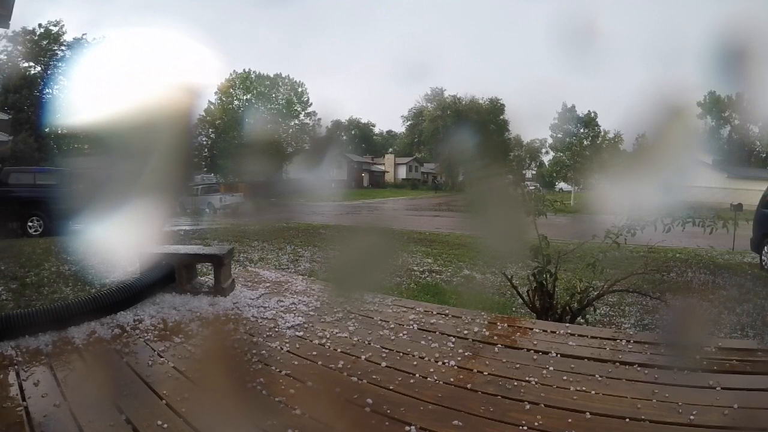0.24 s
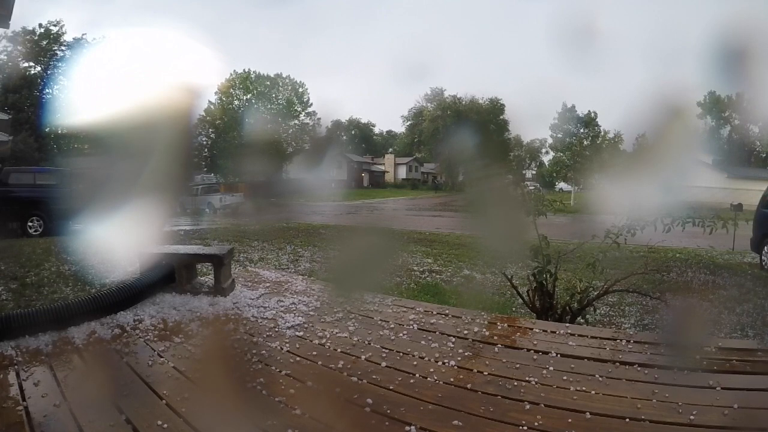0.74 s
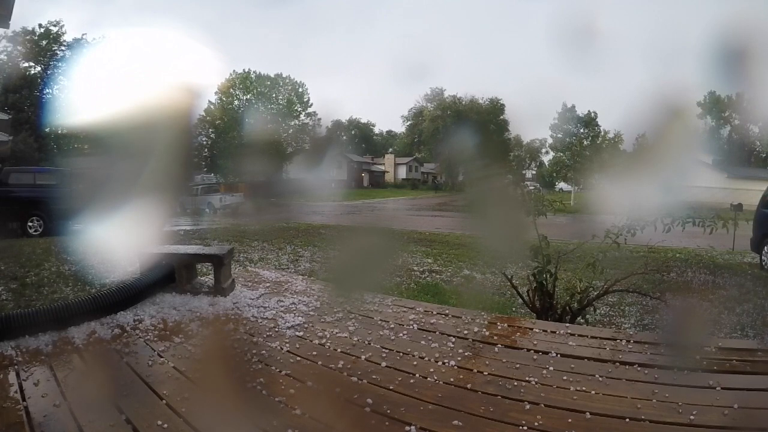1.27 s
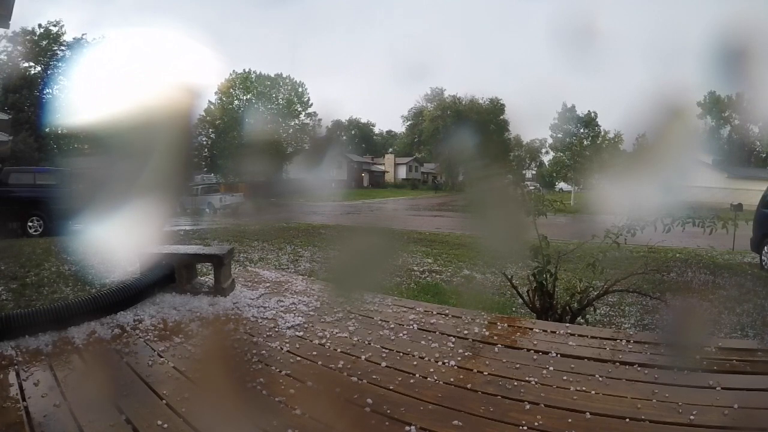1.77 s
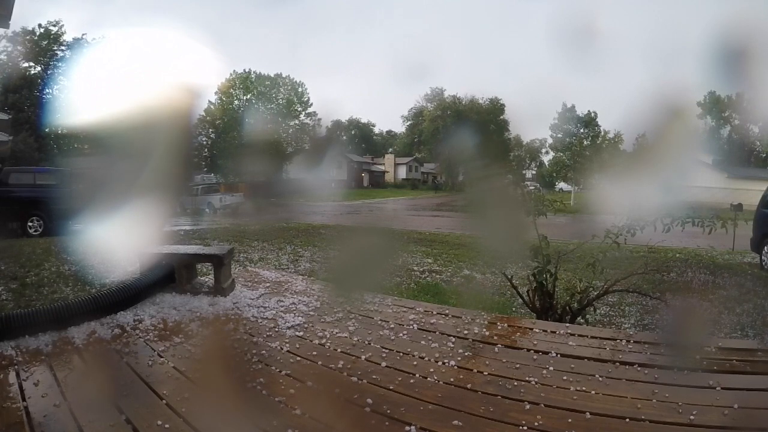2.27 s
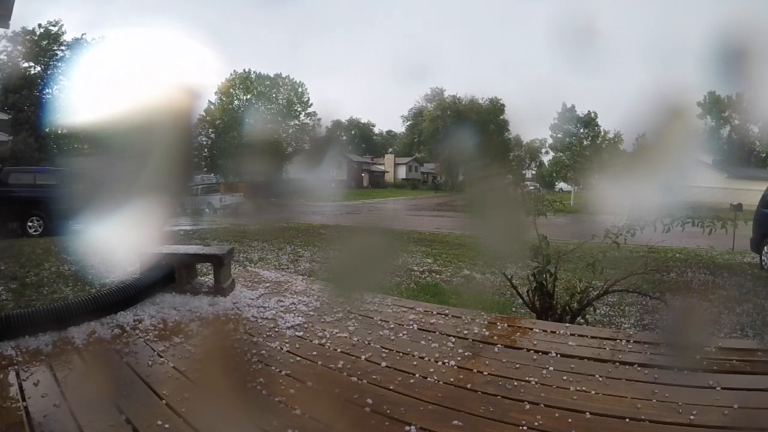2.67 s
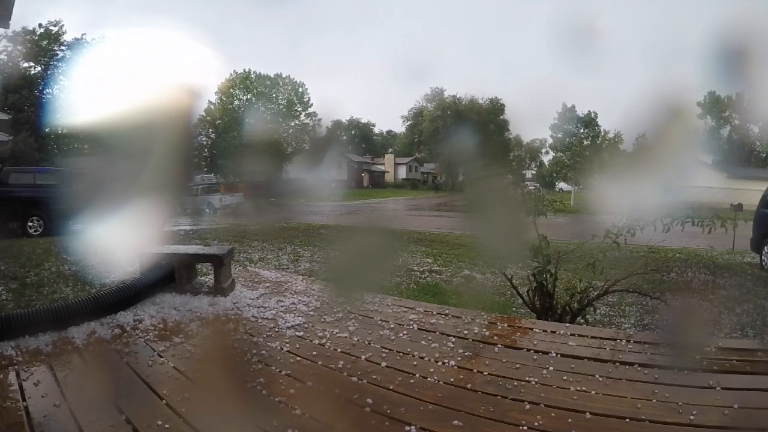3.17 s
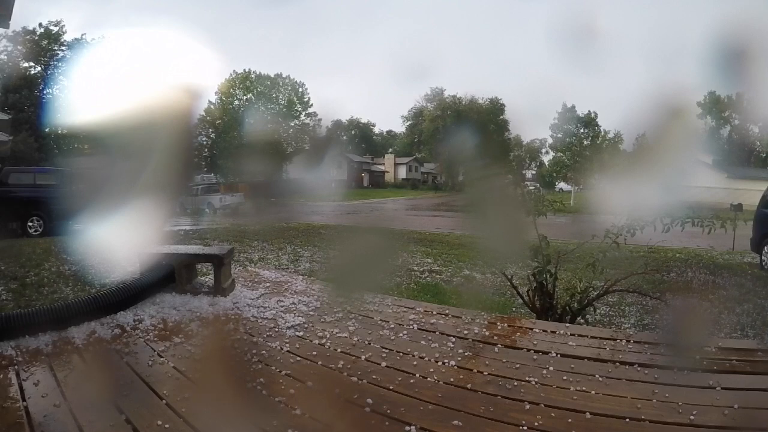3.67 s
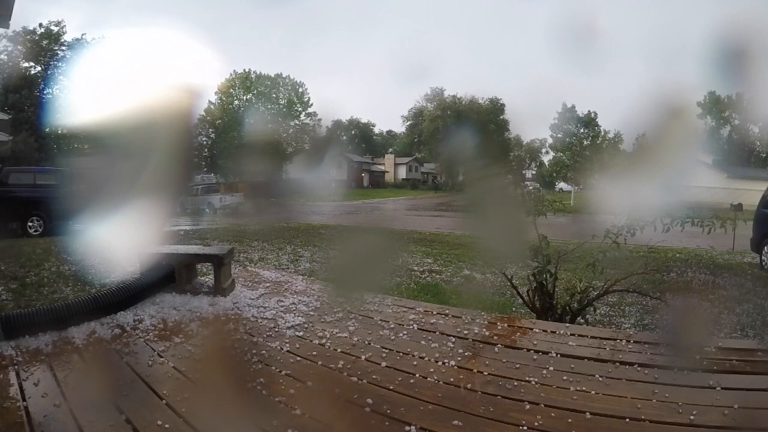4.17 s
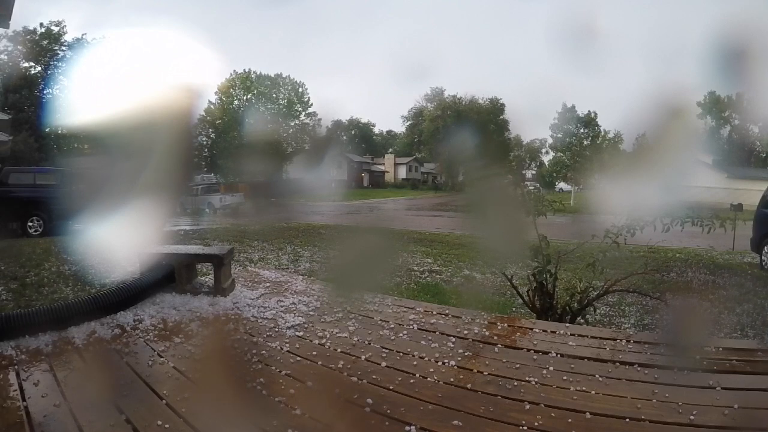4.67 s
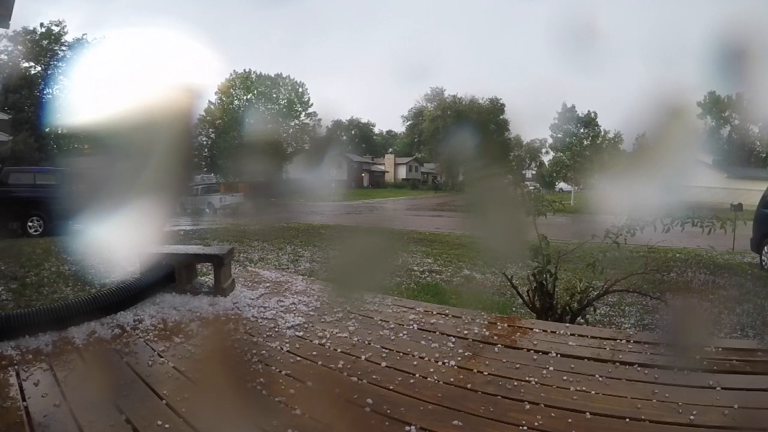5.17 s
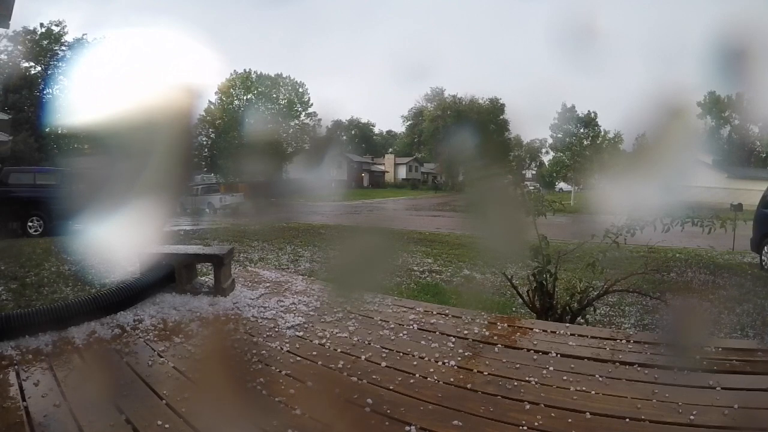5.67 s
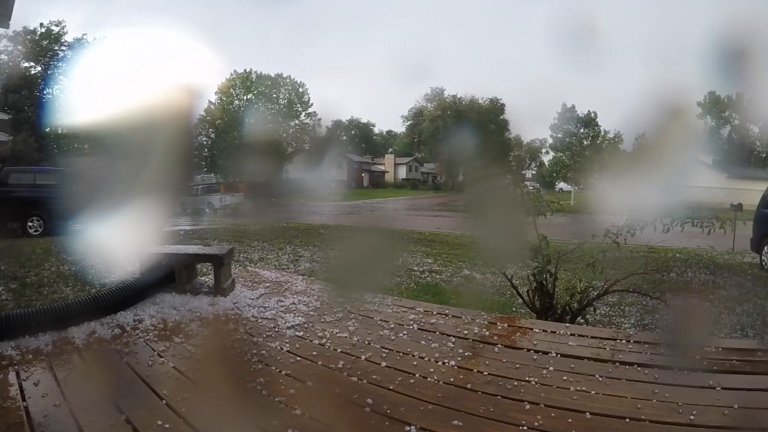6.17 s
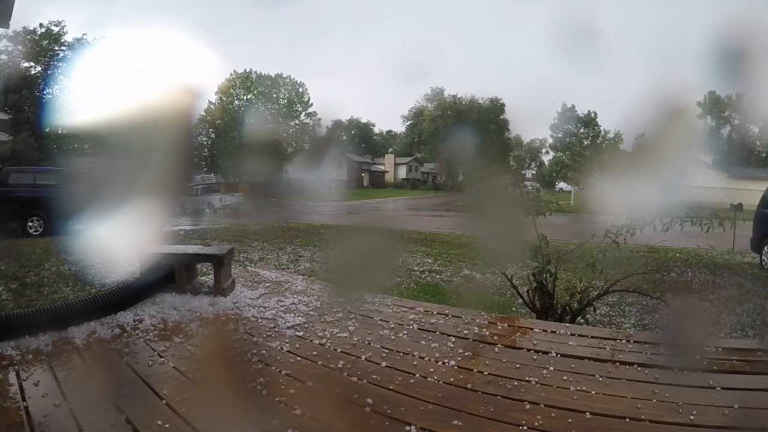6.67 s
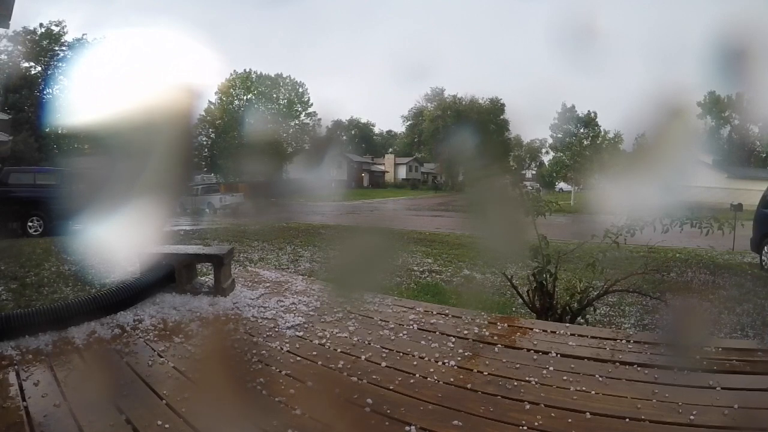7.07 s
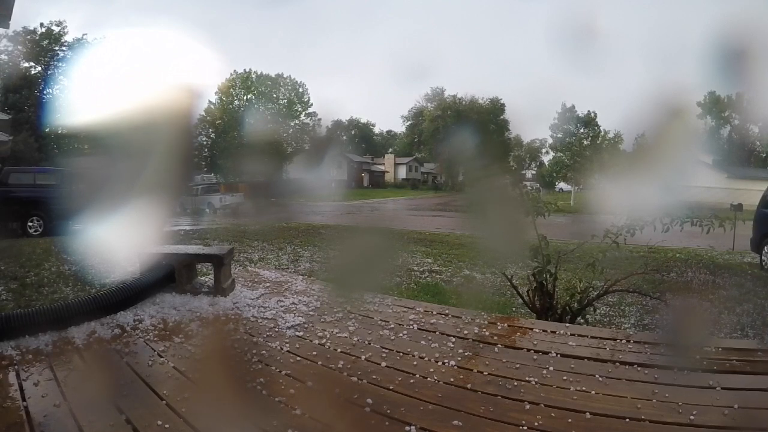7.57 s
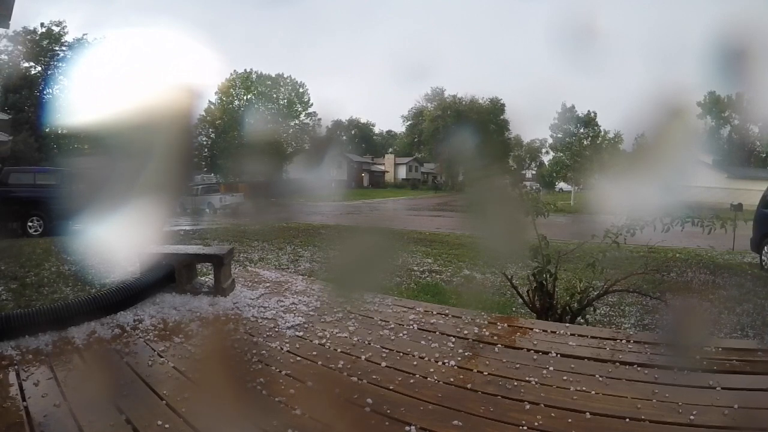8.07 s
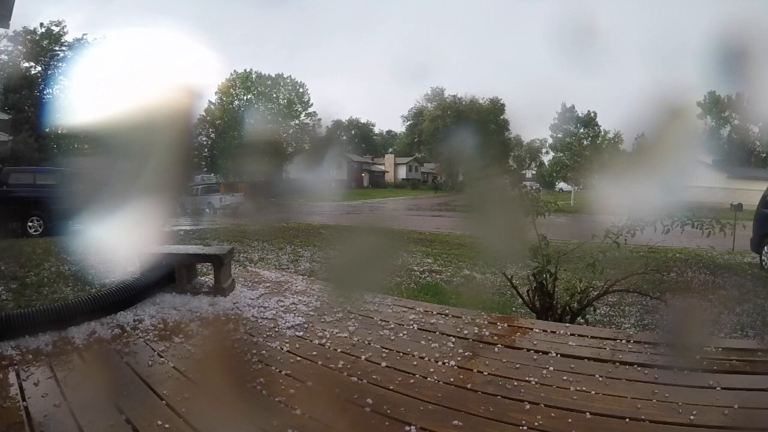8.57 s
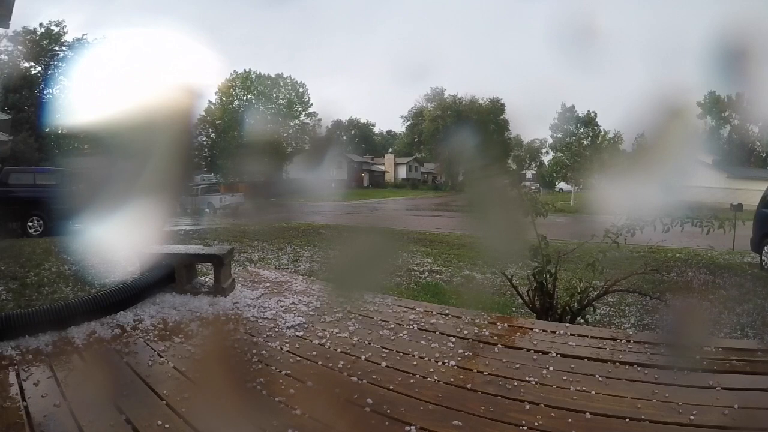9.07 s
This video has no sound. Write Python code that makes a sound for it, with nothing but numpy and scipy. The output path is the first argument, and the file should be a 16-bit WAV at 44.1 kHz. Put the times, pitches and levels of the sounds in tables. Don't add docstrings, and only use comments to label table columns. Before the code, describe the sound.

Outdoors on a wooden deck, hail falls steadily from start to finish. Low woody thumps with short boomy tails come several per second, mixed with very close plastic cracks, knocks and tiny ticks. Fine rain hisses softly behind. Slow gusts add a very deep rumble. The microphone sits on the deck inside a small plastic housing; the hardest blows clip and briefly duck everything, in wide but close stereo.

```python
import sys
import numpy as np
from scipy import signal
from scipy.fft import rfft, irfft, next_fast_len
from scipy.io import wavfile
from scipy.ndimage import uniform_filter1d

SR = 44100
rng = np.random.default_rng(int(sys.argv[2]) if len(sys.argv) > 2 else 0)


def to_wav(s):
    ch = np.atleast_2d(s).T
    pcm = np.round(np.clip(ch, -1, 1) * 32767)
    wavfile.write(sys.argv[1], SR, pcm.astype(np.int16))


def gain_from_db(level_db):
    decades = np.asarray(level_db, float) / 20
    return 10 ** decades


N = 411453
BLOW_UNEVEN_DB = 1.5


def evened(x):
    return x / np.sqrt(np.mean(x ** 2) + 1e-20)


def read(points, hz):
    f, value = np.transpose(points)
    return np.interp(np.log(hz + 1), np.log(f + 1), value)


def curve(rows):
    start_s, level_db = np.transpose(rows)
    return np.interp(np.arange(N) / SR, start_s, level_db)


def add(mix, start_s, sound):
    part = mix[..., round(start_s * SR):][..., :sound.shape[-1]]
    part += sound[..., :part.shape[-1]]


def at(course, start_s):
    return course[round(start_s * SR)]


# start_s, drop_db
GAIN_TRIPS = [
    (0.447, 4.5),
    (1.487, 20),
    (2.578, 11),
    (4.575, 2),
    (5.225, 3),
    (6.331, 9),
    (6.497, 8),
    (7.598, 10),
    (9.177, 13.5),
]


def gain_db():
    t, out = np.arange(N) / SR, np.zeros(N)
    for start_s, drop_db in GAIN_TRIPS:
        since = np.maximum(t - start_s, 0)
        quick = .72 * np.exp(-(since / .1) ** 1.7)
        slow = .28 * np.exp(-since / .6)
        out -= drop_db * (t > start_s) * (quick + slow)
    return uniform_filter1d(out, size=100)


def ring(modes, uneven_db, detune, seconds, rise_s):
    hz, db, t60 = np.transpose(modes)[..., None]
    t = np.arange(int(seconds * SR)) / SR
    pitch_chance, level_chance, phase_chance = rng.standard_normal((3, 2, len(modes), 1))
    tone = np.sin(2 * np.pi * (hz * (1 + detune * pitch_chance) * t + 0.22 * phase_chance))
    decay = gain_from_db(db + uneven_db * level_chance - 60 * t / t60)
    out = (decay * tone).sum(1) * (1 - np.exp(-t / rise_s)) ** 2
    return out / np.abs(out).max(1, keepdims=True)


def patter(modes, per_s, spread_db, uneven_db, detune, seconds, rise_s, kinds):
    out = np.zeros((2, N))
    for _ in range(kinds):
        lands = rng.random(N) < per_s / kinds / SR
        hits = lands * gain_from_db(spread_db * np.minimum(rng.exponential(1, N), 3.5))
        blow = ring(modes, uneven_db, detune, seconds, rise_s)
        out += signal.oaconvolve(hits[None], blow, axes=1)[:, :N]
    return evened(out)


# freq_hz, density_db (per Hz)
RAIN_SPECTRUM = [(400, -29), (600, -2.5), (800, -3), (1000, -4), (1430, -3), (2010, -12.5), (2500, -17),
                 (3500, -22), (4800, -22), (6300, -20.5), (10500, -25.5), (12600, -37), (14200, -31.5),
                 (16000, -82.5)]


def rain():
    frames, hz = N // 128 + 5, np.fft.rfftfreq(512, 1 / SR)
    a, b, c, d, patches = rng.standard_normal((frames, 257, 5)).T
    patches = uniform_filter1d(patches, size=10, axis=0)
    patches = evened(uniform_filter1d(patches, size=5, axis=1))
    flicker = evened(uniform_filter1d(rng.standard_normal(frames), size=3))
    level = gain_from_db(read(RAIN_SPECTRUM, hz)[:, None] + 1.9 * patches + 1.1 * flicker)
    spectra = np.array([a + 1j * b, c + 1j * d]) * level
    hiss = signal.istft(spectra, nperseg=512, noverlap=384)[1][:, :N]
    return gain_from_db(-43.5) * evened(hiss)


# start_s, level_db
ROCKING_GUSTS = [(0, -58.5), (1.36, -54), (1.46, -44.5), (2.3, -30.5), (2.7, -29.5), (3.55, -29.5),
                 (3.9, -43), (4.65, -43.5), (5.15, -51), (5.3, -36), (6.25, -51.5), (6.36, -33.5),
                 (6.75, -29), (7.3, -30), (7.7, -29.5), (8.1, -26.5), (9.1, -46), (9.2, -36)]


def mount():
    wander = evened(uniform_filter1d(rng.standard_normal(N), size=8000))
    turns = np.cumsum(25 * (1 + 0.045 * wander)) / SR
    return np.sqrt(2) * gain_from_db(curve(ROCKING_GUSTS) - gain_db() - 3) * np.sin(2 * np.pi * turns)


def boom_db():
    fade = 9.5 * np.arange(N) / SR
    held = np.maximum.accumulate(curve(ROCKING_GUSTS) + fade) - fade
    return -28.5 + 0.97 * (held + 30)


# freq_hz, level_db, t60_s
JOIST_MODES = [(39.5, -13.5, 0.83), (54.9, -9, 0.75), (81.6, -17.5, 0.62), (88, 2.5, 0.66),
               (103.8, 3, 0.92)]


def joists():
    return patter(JOIST_MODES, 53, 3.9, 3.4, 0.11, .6, 0.006, kinds=6) * gain_from_db(boom_db() - gain_db())


# freq_hz, level_db, t60_s
SHELL_LOW_MODES = [(640, -4, 0.024), (780.5, -13, 0.17), (980, -8, 0.076), (1130, -5, 0.039),
                   (1393.5, -4.5, 0.048), (1620, -11, 0.04)]
SHELL_MID_MODES = [(1645, 5.5, 0.0038), (2314, -2.5, 0.012), (2480, -4.5, 0.04), (2765, -14, 0.013),
                   (3240, -7.5, 0.016), (4460, -10, 0.0015), (4400, -31, 0.00096)]
SHELL_TOP_MODES = [(5790, 1, 0.005), (6360, 6.5, 0.003), (7640, -2.5, 0.0015), (9120, -4, 0.0037),
                   (9970, -24, 0.0042), (13400, -23.5, 0.0023)]


def lowered(modes, db):
    return [(f, d - db, t60) for f, d, t60 in modes]


def prickle(boards):
    spread_db, top = 3.8, SHELL_TOP_MODES[:5]
    clumps = gain_from_db(2.9 * evened(uniform_filter1d(rng.standard_normal(N), size=2500)))
    whole = SHELL_LOW_MODES + lowered(SHELL_MID_MODES, 5) + lowered(top, 17)
    fine = gain_from_db(-43.0) * patter(whole, 110, spread_db, 3.6, 0.043, .07, 0.0003, kinds=14)
    fine += gain_from_db(-44.5) * patter(SHELL_LOW_MODES, 240, spread_db, 6.2, 0.0708, 0.1, 0.00079, kinds=14)
    fine += gain_from_db(-53.0) * patter(SHELL_MID_MODES, 800, spread_db, 16.0, 0.06, .04, 0.0003, kinds=12)
    fine += gain_from_db(-75.0) * patter(top, 500, 3.0, 4.9, 0.21, 0.022, .0001, kinds=6)
    fine = signal.sosfilt(signal.butter(6, 12500, fs=SR, output="sos"), fine)
    shake = evened(np.abs(uniform_filter1d(boards ** 2, size=900)) ** 0.27)
    return clumps * shake * fine


# start_s, level_db (peak), pitch_hz
SHELL_TAPS = [(0.136, -21, 780), (0.217, -26, 656), (0.355, -26, 790), (0.397, -19, 708),
              (0.436, -26.5, 794), (0.559, -27, 786), (0.629, -30.5, 784), (0.996, -25, 685),
              (1.04, -36, 774), (1.059, -24, 684), (1.081, -22, 657), (1.136, -29.5, 724),
              (1.276, -25, 742), (1.349, -19, 676), (1.424, -12.5, 687), (1.431, -16, 664),
              (1.631, -27, 794), (1.74, -31, 821), (1.795, -31, 680), (1.942, -25, 680),
              (2.018, -28.5, 694), (2.109, -32, 686), (2.255, -29, 730), (2.363, -21, 707),
              (2.529, -19.5, 800), (2.887, -28, 807), (3.109, -19, 713), (3.306, -22.5, 710),
              (3.333, -36, 795), (3.436, -21, 696), (3.954, -23, 770), (4.019, -37, 650),
              (4.063, -23.5, 1130), (4.196, -25.5, 1130), (4.399, -17.5, 1130), (4.518, -30, 690),
              (4.572, -35.5, 800), (4.687, -17, 1130), (4.996, -37, 820), (5.113, -24, 1470),
              (5.214, -18, 728), (5.252, -25, 710), (5.329, -24, 704), (5.486, -19, 760),
              (5.665, -21.5, 830), (5.982, -32.5, 790), (6.105, -24.5, 690), (6.657, -22.5, 644),
              (6.828, -18.5, 670), (7.059, -18.5, 685), (7.161, -21, 780), (7.827, -21, 1060),
              (7.955, -21.5, 683), (8.129, -28.5, 700), (8.447, -34, 994), (8.711, -26.5, 1130)]
# start_s, level_db (peak), pitch_hz
RIM_PINGS = [(1.4404, -20.5, 2510), (1.4544, -37, 2290), (3.894, -13, 2480), (4.747, -28, 2230),
             (6.371, -32.5, 2350), (7.233, -31.5, 2600), (8.6024, -17, 2390), (8.6587, -31, 2420),
             (8.9444, -38, 2380), (9.0359, -48, 2530), (9.3254, -50, 2340), (3.463, -17, 800),
             (5.189, -20, 755), (5.787, -24, 800), (6.684, -31, 780)]


def taps():
    out, room = np.zeros((2, N)), gain_db()
    rest = lowered(SHELL_LOW_MODES, 4) + lowered(SHELL_MID_MODES, 15)
    for rows, t60 in ((SHELL_TAPS, 0.072), (RIM_PINGS, 0.047)):
        for start_s, db, hz in rows:
            tap = ring(rest + [(hz, 0, t60)], BLOW_UNEVEN_DB, 0.0054, .08, 0.00047)
            add(out, start_s, gain_from_db(db - at(room, start_s)) * tap)
    return out


# start_s, level_db (peak)
LID_RINGS = [
    (1.3003, -23),
    (1.4893, -9.5),
    (1.6473, -39),
    (3.1454, -10.5),
    (3.216, -8.5),
    (3.4922, -15),
    (4.6409, -16.5),
    (6.8678, -22.5),
    (8.7595, -24),
    (9.0653, -28.5),
]
# freq_hz, level_db, t60_s
LID_MODES = [(830, 2.5, 0.076), (1397, 4, 0.062)]


def lid():
    out, room = np.zeros((2, N)), gain_db()
    for start_s, db in LID_RINGS:
        add(out, start_s, gain_from_db(db - at(room, start_s)) * ring(LID_MODES, 1.1, 0.0076, .12, 0.00028))
    return out


# start_s, level_db (peak), low_db, top_db, pitch_hz (knock)
SHELL_CRACKS = [(0.52, -14, -11, -9, 715), (0.6778, -18.5, 7, -0.5, 743), (0.7003, -14.5, 5, -16, 745),
                (1.3006, -7, -0.5, -1, 1420), (1.483, 2, -0.5, -7.5, 800), (2.5585, -17, -1, -19, 837),
                (2.5681, -11.5, 0, -12, 1320), (3.1314, -5, -11.5, -4, 807), (3.547, -6.5, 3.5, -14.5, 712),
                (3.8563, -13, -12, 3, 1510), (3.885, -15, -0.5, -13, 810), (4.358, -14, -1.5, -28, 1396),
                (4.6403, -3.5, -7, -10, 762), (4.82, -12, 8.5, -30, 618), (5.6363, -8, -21, -3, 824),
                (5.901, -13.5, -6, -35, 780), (6.2025, -7.5, -7, 1, 1460), (6.3248, -12, -1, -8, 613),
                (7.357, -14.5, 7.5, -10, 1390), (7.5379, -7.5, 2.5, -35.5, 513),
                (7.668, -11.5, -4, -10, 1620), (8.551, -14, -4, -9.5, 1380), (8.5862, -5, 1.5, -17, 1210),
                (8.6175, -12, 8, -6, 620)]
# start_s, level_db (peak), top_db
SHELL_TICKS = [(0.757, -27.5, -20), (1.21, -25.5, -16), (1.4266, -18.5, -30.5), (1.436, -20, -28.5),
               (1.6971, -20, -7.5), (2.4036, -21, -10), (2.505, -21.5, -18), (2.666, -26.5, -11),
               (2.843, -17, -5.5), (2.9067, -15, -11.5), (3.086, -22.5, -28), (3.492, -19.5, -7.5),
               (3.768, -22, -25), (4.33, -16, -13), (5.186, -20, -15), (5.3516, -18.5, -13),
               (6.0007, -26.5, -8), (6.4898, -16, -27), (6.54, -21.5, -5.5), (6.731, -20, -27),
               (6.8482, -21, -10), (6.8678, -21, -7), (6.922, -23.5, -3), (6.9672, -25, -7),
               (7.311, -18, -37), (7.7092, -22, -11), (8.228, -17, -11.5), (8.759, -31, -11),
               (9.157, -21, -35), (5.1402, -24, -26)]
# start_s, level_db (peak), top_db
SHELL_PELLETS = [
    (3.6965, -31, -15),
    (4.3834, -26, -8),
    (4.4932, -39, -11),
    (6.2367, -28, -17),
    (7.9578, -30, -3),
]
# start_s, level_db (knock peak), pitch_hz
WET_KNOCKS = [(0.12, -20, 735), (0.2578, -24.5, 670), (0.8247, -17.5, 980), (0.9456, -13.5, 1460),
              (1.4182, -4.5, 775), (1.647, -14, 880), (2.4494, -11, 1480), (2.6161, -11, 590),
              (2.977, -20.5, 1130), (3.148, -15.5, 1100), (3.216, -8.5, 890), (3.362, -15, 597),
              (4.4502, -12, 704), (4.7471, -37, 630), (4.793, -18.5, 1110), (6.309, -46, 570),
              (6.417, -12.5, 1634), (6.4738, -7, 702), (6.791, -21, 1445), (7, -16, 970),
              (7.1864, -11, 930), (7.232, -20, 640), (7.2813, -11, 1636), (7.5722, -28.5, 734),
              (7.648, -16.5, 704), (7.7992, -15.5, 634), (8.2062, -20, 835), (8.8833, -33, 1100),
              (9.066, -28, 855), (9.1734, -44, 700)]


def housing_blows():
    ticks = [(s, db, -1, top_db, 780) for s, db, top_db in SHELL_TICKS + SHELL_PELLETS]
    knock_over_tick_db = 9
    knocks = [(s, db - knock_over_tick_db, knock_over_tick_db, -20, hz) for s, db, hz in WET_KNOCKS]
    return SHELL_CRACKS + ticks + knocks


DULLING = 0.45
# freq_hz, density_db (per Hz)
SPRAY_SPECTRUM = [(300, -33), (600, -3), (1400, -1), (2500, 12), (4000, -8), (5600, -7), (9000, -25),
                  (14000, -52)]


def spray():
    out, room, t = np.zeros((2, N)), gain_db(), np.arange(2048) / SR
    hz = np.fft.rfftfreq(len(t), 1 / SR)
    octaves = np.log2(np.maximum(hz / 2000, 1))
    crack, splinters = np.exp(-t / 0.0012), .5 * gain_from_db(-60 * t / 0.029)
    fall = (crack + splinters) * (1 - np.exp(-t / 0.00067)) ** 2
    for start_s, db, _, top_db, _ in housing_blows():
        colour = gain_from_db(read(SPRAY_SPECTRUM, hz) + DULLING * min(top_db + 14, 0) * octaves)
        hiss = evened(irfft(rfft(rng.standard_normal((2, len(t)))) * colour, len(t)))
        add(out, start_s, gain_from_db(db - 8.5 - at(room, start_s)) * fall * hiss)
    return out


def chatter(sound, seconds):
    t = np.arange(int(6 * seconds * SR) + 2) / SR
    pushes = 0.08 * rng.standard_normal(800)[:len(t)] ** 3 * np.exp(-t / seconds)
    pushes[0] = 1
    return signal.fftconvolve(sound, pushes[None] / np.linalg.norm(pushes), axes=1)


# freq_hz, level_db, t60_s
SNAP_MODES = [(2080, 7, 0.00087), (3400, -4.5, 0.0023), (4270, 2.5, 0.00064)]


def housing():
    out, room = np.zeros((2, N)), gain_db()
    held = 0.97
    softening = 0.36
    for start_s, db, low_db, top_db, hz in housing_blows():
        lost_db = min(top_db + 7, 0)
        low = [(f, d, held * t60) for f, d, t60 in SHELL_LOW_MODES] + [(hz, 4, 0.035)]
        knock = ring(low, BLOW_UNEVEN_DB, 0.038, 0.1, .00006 * gain_from_db(-lost_db))
        mid = [(f, d + DULLING * lost_db * np.log2(max(f / 2600, 1)), min(held * t60, 0.017))
               for f, d, t60 in SHELL_MID_MODES]
        snap = lowered(SNAP_MODES, -0.5 * (top_db + 8))
        tick = ring(mid + snap, BLOW_UNEVEN_DB, 0.021, .08, .00008 * gain_from_db(-softening * lost_db))
        top = ring(SHELL_TOP_MODES, BLOW_UNEVEN_DB, 0.01, .08, .00006)
        tick += gain_from_db(top_db + softening * lost_db) * top
        level_db = db - at(room, start_s)
        add(out, start_s, gain_from_db(level_db) * chatter(tick, 0.0006))
        add(out, start_s, gain_from_db(level_db + low_db) * chatter(knock, 0.0013))
    return out


# freq_hz, level_db, t60_s
JOLT_MODES = [(300, -0.5, 0.032), (540, 0, .018), (800, -5, 0.015)]


def jolts():
    out = np.zeros((2, N))
    for start_s, db, *_ in SHELL_CRACKS:
        add(out, start_s, gain_from_db(db - 5.5) * ring(JOLT_MODES, 1.8, .05, .04, 0.00026))
    return out * gain_from_db(-gain_db())


# start_s, level_db (peak)
DEEP_BLOWS = [
    (1.421, -24),
    (2.648, -16),
    (3.602, -21),
    (6.719, -22.5),
    (7.05, -30),
    (7.212, -16),
    (9.22, -18.5),
]


def deep_blows():
    out, modes = np.zeros((2, N)), [(f, d, .25) for f, d, _ in JOIST_MODES]
    for start_s, db in DEEP_BLOWS:
        add(out, start_s, gain_from_db(db) * ring(modes, BLOW_UNEVEN_DB, 0.079, .3, 0.0098))
    return out * gain_from_db(-gain_db())


def stiffened(sound):
    return signal.sosfilt(signal.butter(10, 122, "high", fs=SR, output="sos"), sound)


# freq_hz, level_db, t60_s
DECK_MODES = [(140.6, -5, 0.52), (164, -2, 0.48), (200.4, 0.5, 0.3), (239.1, -1, 0.2), (269.1, -4.5, 0.35),
              (298.9, 2, 0.11), (347.6, -11.5, 0.35), (412.6, -4.5, 0.24), (441.7, -13, 0.26),
              (515.6, -6, 0.15), (663, -29, 0.28), (800, -27, 0.089), (1100, -21.5, 0.052)]
# start_s, level_db (peak), pitch_hz
JOIST_THUDS = [(0.32, -6, 164), (1.169, -10.5, 151), (1.484, -8.5, 180), (2.099, -15.5, 214),
               (2.25, -14, 240), (2.27, -14, 199), (2.378, -6, 169), (2.586, -2, 267), (2.638, -7, 153),
               (2.918, -12, 260), (2.938, -9, 186), (3.194, -15, 159), (3.811, -17.5, 178),
               (4.01, -11, 164), (4.109, -12, 171), (4.451, -10.5, 156.5), (4.515, -5.5, 212),
               (4.923, -13.5, 275), (5.184, -3, 183.4), (5.211, -1, 408.5), (5.253, -4.5, 270),
               (5.288, -11, 158), (5.392, -12.5, 244), (5.789, -8.5, 220), (5.905, -8, 164),
               (6.729, -11, 201), (6.879, -11, 195), (7.195, -2.5, 185), (7.648, -7, 157),
               (8.213, -2.5, 207), (8.329, -16.5, 282), (8.95, -14, 160)]


def thuds():
    out, t60_s = np.zeros((2, N)), 0.086
    boards = [(f, d - 7, min(t60, t60_s)) for f, d, t60 in DECK_MODES[:10]]
    for start_s, db, hz in JOIST_THUDS:
        add(out, start_s, gain_from_db(db - 1) * ring(boards + [(hz, 0, t60_s)], BLOW_UNEVEN_DB, 0.0034, .15, 0.0013))
    return stiffened(out) * gain_from_db(-gain_db())


# start_s, level_db (peak), pitch_hz (loudest), upper_db (upper modes)
HEAVY_STONES = [(0.123, -4.5, 267, -12), (0.319, -5.5, 164, -35.5), (0.435, -3.5, 319, -8),
                (0.934, -2.5, 163.6, -9.5), (0.981, -1, 167.5, -8), (1.355, -0.5, 237.5, -14),
                (1.418, -1, 194, -2), (2.529, -2.5, 199.4, 0.5), (2.568, 0.5, 195, -15.5),
                (3.559, 0, 183.6, -21), (3.897, -0.5, 297.6, -32), (3.953, -3.5, 309, -26.5),
                (4.514, -9, 215, -18.5), (4.567, -0.5, 171, -1.5), (5.213, -3.5, 198, -9),
                (5.319, -1.5, 189.5, -20), (6.325, -0.5, 158, 6.5), (6.4705, -1.5, 165, 1.5),
                (6.654, -1.5, 309, 12.5), (7.005, -1, 243.6, -32.5), (7.19, -5, 205, -9.5),
                (7.572, 1, 218, -4), (7.757, -4, 176.6, -19), (7.802, 1.5, 187.3, -18.5),
                (7.833, -8, 233, -25), (7.958, -5, 188, -14), (8.212, -4.5, 204.6, -16),
                (8.587, -2, 251, -11.5), (8.879, -1.5, 217, -9), (9.156, -3, 399, -4)]
# start_s, level_db (peak), pitch_hz (loudest)
MIDDLING_STONES = [(0.229, -6.5, 288), (0.551, -6.5, 323), (0.616, -5.5, 220.6), (0.681, -6.5, 277),
                   (0.827, -3.5, 310), (1.04, -4, 229), (1.11, -5.5, 171.5), (1.277, -2, 181),
                   (1.948, -9, 262), (2.293, -7, 227), (2.364, 0, 285), (2.753, -8.5, 234),
                   (2.833, -11, 164), (2.975, -4, 135.3), (3.116, -7.5, 232), (3.315, -2.5, 204),
                   (3.504, -6, 348), (4.207, -4.5, 246), (4.398, -9, 294), (4.744, -4.5, 190),
                   (5.009, -5, 199), (5.484, -6.5, 187), (5.867, -12.5, 186), (6.021, -6.5, 155),
                   (6.1, -6.5, 205), (6.825, -7.5, 200), (6.953, -13, 230), (7.226, -3.5, 185),
                   (8.457, -6.5, 175.7), (9.028, -10, 330)]
# start_s, level_db (peak), pitch_hz
MORE_STONES = [(0.003, -13.5, 231), (4.448, -8, 207), (0.409, -4, 164), (1.388, -7, 175), (1.519, -9, 173),
               (1.592, -16, 159), (3.726, -9, 262), (4.823, -9.5, 177), (5.858, -9.5, 421),
               (6.377, -4.5, 139.4), (7.054, -10.5, 215), (7.356, -7.5, 149), (8.12, -10.5, 204),
               (9.169, 0.5, 190)]
# start_s, level_db (peak), pitch_hz (loudest)
STILL_MORE_STONES = [(0.034, -23, 159), (0.488, -8.5, 164), (1.649, -30, 142.5), (1.732, -14.5, 140.5),
                     (1.83, -17.5, 201), (2.062, -12.5, 203), (2.144, -14.5, 182), (2.18, -11.5, 200.4),
                     (3.609, -12, 170.5), (4.059, -5.5, 146), (4.278, -9.5, 145), (4.884, -19.5, 177),
                     (4.92, -12.5, 264), (4.97, -13.5, 157), (5.148, -14.5, 275), (5.455, -4, 154.5),
                     (5.831, -9, 188), (7.451, -34.5, 154), (7.551, -7, 231.3), (8.035, -13, 255),
                     (8.064, -15, 166), (8.386, -13.5, 156), (8.553, -11, 167), (8.608, -4.5, 130.6),
                     (8.705, -10, 142), (8.982, -23.5, 231), (9.06, -8, 183)]


def board_blows():
    middling = [row + (-14.5,) for row in MIDDLING_STONES]
    others = [row + (-21.5,) for row in MORE_STONES + STILL_MORE_STONES]
    return HEAVY_STONES + middling + others


# start_s, level_db
DECK_DRUMMING = [(0.0, -24.5), (0.52, -15.5), (0.68, -24.5), (1.3, -20), (1.82, -28.5), (2.55, -19),
                 (3.3, -20.5), (3.51, -14), (3.71, -22.5), (4.68, -16.5), (6.86, -24.5), (7.12, -18.5),
                 (7.51, -21.5), (7.77, -20.5), (8.29, -26.5), (9.33, -20.5)]


def deck():
    out, room, t = np.zeros((2, N)), gain_db(), np.arange(int(.4 * SR)) / SR
    swing = 0.59 + 0.46 * np.exp(-t / 0.022)
    for start_s, db, hz, upper_db in board_blows():
        modes = []
        for f, d, t60 in DECK_MODES:
            away_db = 7 * abs(np.log2(f / hz)) * (f < 600)
            bright_db = 0.37 * (upper_db + 30.0) * (f > 330)
            modes.append((f, d - away_db + bright_db, t60))
        blow = ring(modes + [(hz, 3, .17)], 4.15, 0.014, .4, 0.00092) * swing
        seen = room[round(start_s * SR):][:len(t)]
        trips = any(0 < trip_s - start_s < .03 for trip_s, _ in GAIN_TRIPS)
        add(out, start_s, gain_from_db(db - (seen if trips else seen[0])) * blow[:, :len(seen)])
    drumming = patter(DECK_MODES, 130, 3.0, 7.9, 0.04, 0.3, 0.0012, kinds=24)
    out += drumming * gain_from_db(curve(DECK_DRUMMING) - room - 0.63)
    return stiffened(out)


# freq_hz, share (0 to 1)
PORT_LIKENESS = [(60, 0.96), (430, 0.91), (750, 0.72), (1100, 0.73), (3500, 0.19), (9000, 0.07)]
# freq_hz, level_db
PORT_LEAN = [(50, 0), (130, 3), (250, 4.5), (420, 10.5), (600, 2.5), (770, -4), (1130, 2.5), (1700, -4),
             (2300, -2), (2900, 6), (3800, -8), (4400, 0), (6800, 4), (8600, -3)]
# freq_hz, phase_rad
PORT_LAG = [(40, 0), (110, .5), (200, .55), (330, 1.05), (450, 1.6), (510, 3.1), (740, 5.2), (1000, 2.3),
            (2300, 2.3), (3100, 7), (3800, 6.6), (4200, 8.6), (5200, 10.2), (9500, 12.4)]


def ports(pair):
    size = next_fast_len(N + 4096)
    hz, (shared, other) = np.fft.rfftfreq(size, 1 / SR), rfft(pair, size)
    same, lean = np.clip(read(PORT_LIKENESS, hz), 0, 1), gain_from_db(read(PORT_LEAN, hz) / 2)
    right = (same * shared + np.sqrt(1 - same ** 2) * other) * np.exp(-1j * read(PORT_LAG, hz))
    return irfft(np.array([shared * lean, right / lean]), size)[:, :N]


def scene():
    boards = deck() + joists()
    heard = boards + rain()
    heard += housing() + lid() + prickle(boards[0] * gain_from_db(gain_db()))
    heard += taps() + spray()
    heard += thuds() + deep_blows() + jolts()
    return ports(heard) + mount()


def top_cut(x):
    return signal.sosfilt(signal.butter(12, 16460, fs=SR, output="sos"), x)


def record(dry):
    return top_cut(np.clip(dry * gain_from_db(gain_db()), -1, 1))


dry = scene()
out = record(dry)
to_wav(out)
```